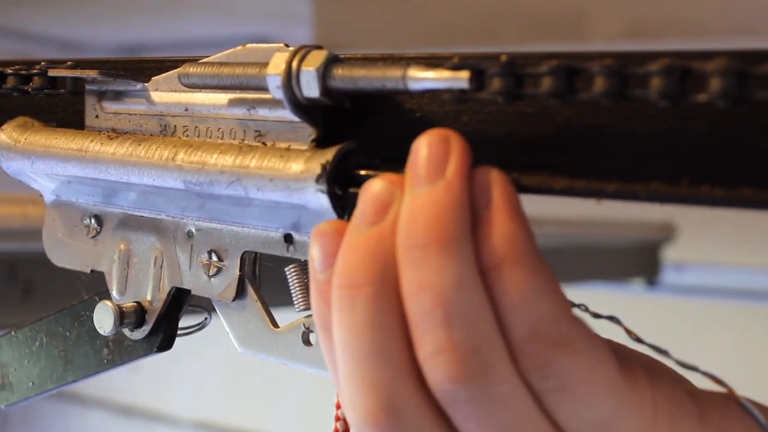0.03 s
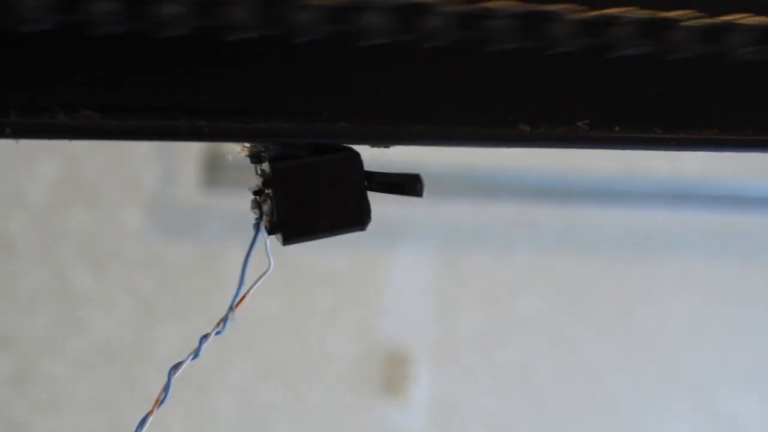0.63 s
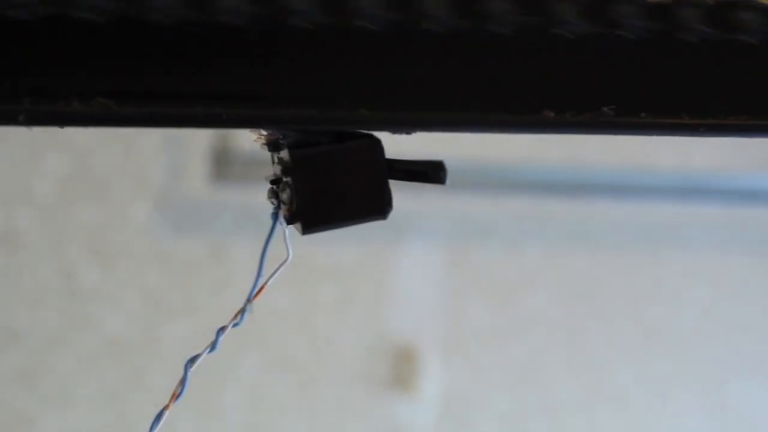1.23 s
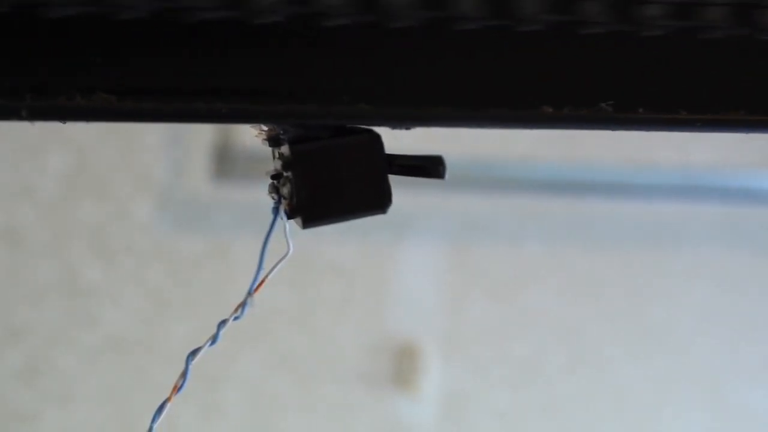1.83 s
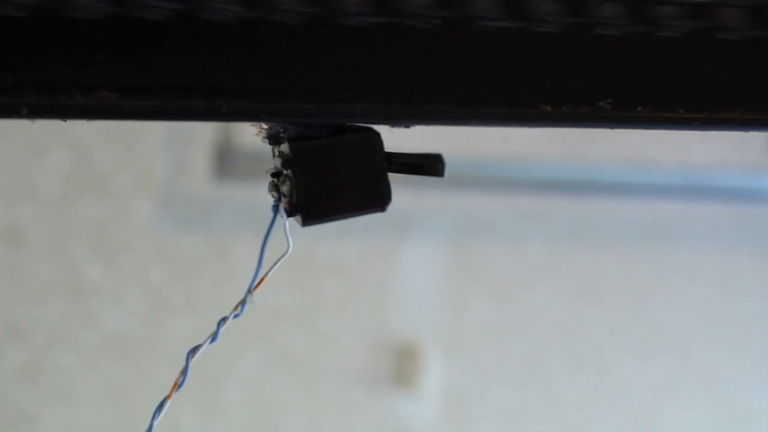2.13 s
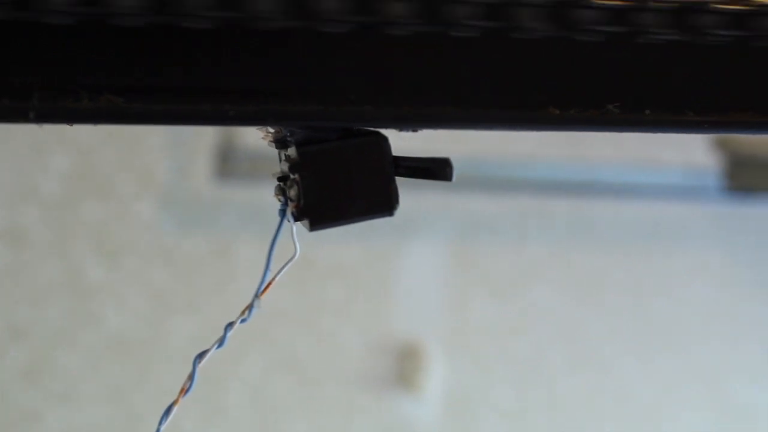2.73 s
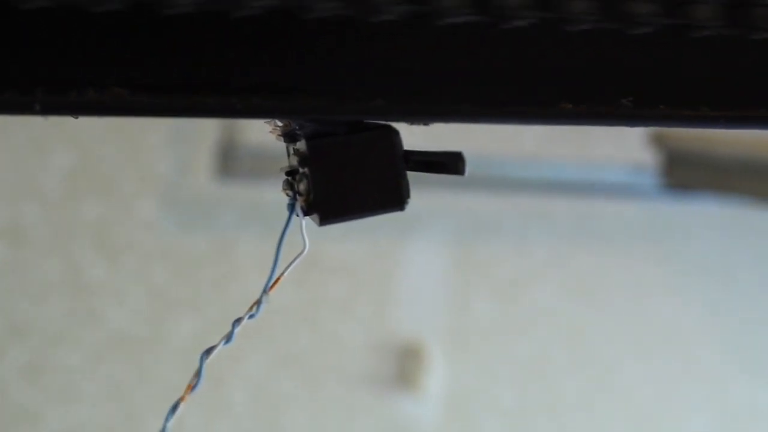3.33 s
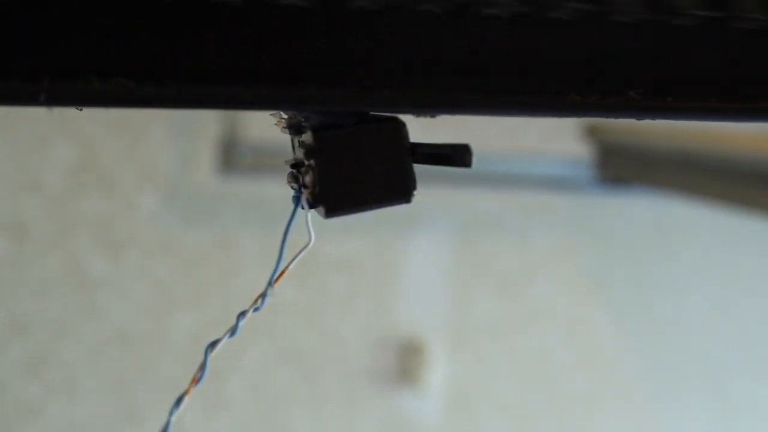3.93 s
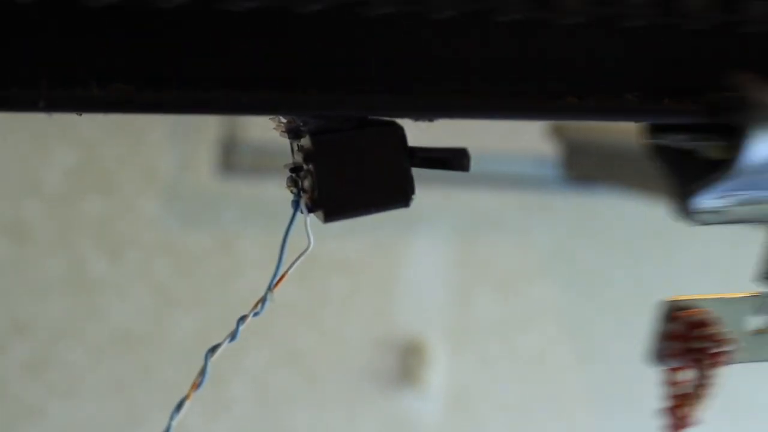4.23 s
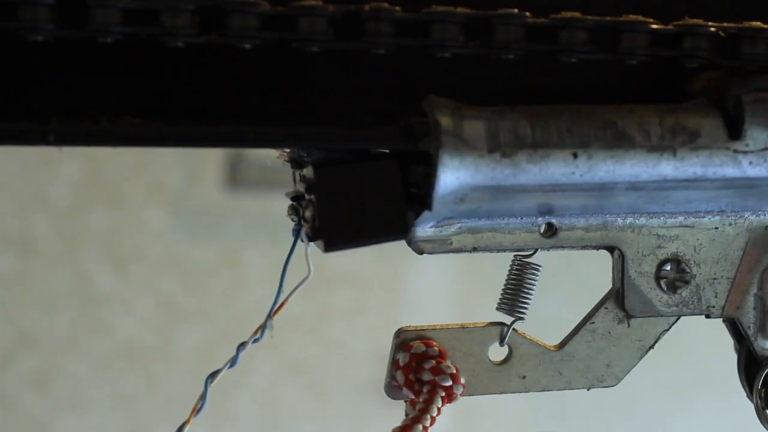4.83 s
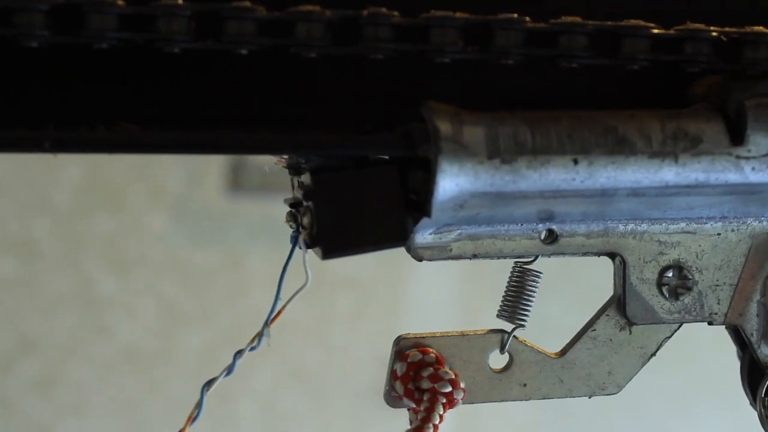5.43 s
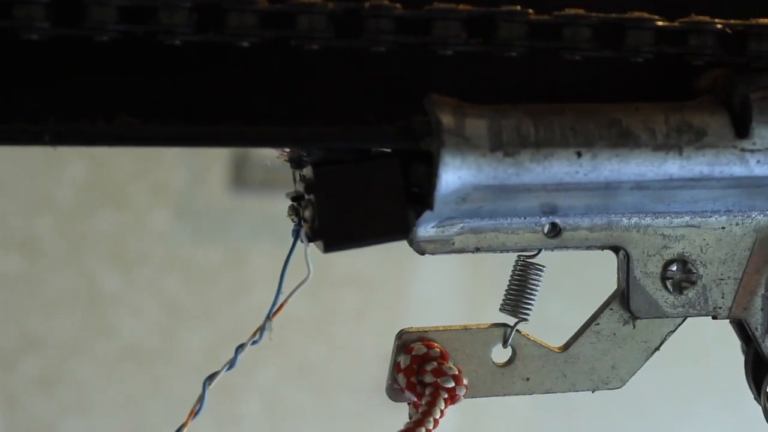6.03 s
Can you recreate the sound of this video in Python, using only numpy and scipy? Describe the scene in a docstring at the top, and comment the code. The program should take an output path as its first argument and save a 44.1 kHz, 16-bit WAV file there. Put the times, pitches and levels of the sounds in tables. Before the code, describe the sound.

A garage door opener comes in abruptly, already running, its motor humming low and its gears whining while the chain clatters and knocks against a rumbling metal rail. A dry switch click cuts the power and the rattle quickly dies away. A few fading metallic clicks follow, with faint birdsong and a soft hush from outdoors. The microphone is close beneath the rail, and the garage adds a short echo.

```python
"""In a garage, just under the rail of a chain-driven door opener, the running drive is heard abruptly.
The motor hums at twice the mains frequency, gears whine and loose sheet metal buzzes, while the chain
rattles, slaps and scrapes along the rail, exciting its resonances. A limit switch cuts the power and
the drive coasts to rest. Trolley and chain click as they settle, and birds sing faintly outside."""
import sys
import numpy as np
from scipy import signal
from scipy.fft import rfft, irfft
from scipy.io import wavfile

SR = 44100
rng = np.random.default_rng(int(sys.argv[2]) if len(sys.argv) > 2 else 0)


def transcribe(signal):
    """Save signal, clipped to [-1, 1], as a 16-bit WAV file at the path in sys.argv[1]."""
    frames = np.atleast_2d(signal).T
    limited = np.clip(frames, -1, 1)
    pcm = np.round(limited * 32767).astype(np.int16)
    wavfile.write(sys.argv[1], SR, pcm)


N = 268877
TIME = np.arange(N) / SR
START_S, POWER_OFF_S, STANDSTILL_S = 0.4275, 4.54, 4.91
HUM_HZ, LINK_HZ, FIRST_LINK_S = 120.0, 14.285, 0.057
TRILL_START_S, TRILL_PERIOD_S = 5.066, 0.098
GARAGE_T60_S, CUTOFF_HZ = 0.36, 15750

# Spectral envelopes. Each row: frequency in Hz, relative spectral density in dB.
OUTDOOR_SPECTRUM = [(25, -3), (140, 0), (300, -6), (420, -12), (600, -1), (900, -12), (1700, -12.5),
                    (2500, -11), (3500, -6.5), (5300, -7.5), (6300, -15), (8800, -25), (16000, -25)]
KNOCK_SPECTRUM = [(100, -27), (300, 1), (700, 2.5), (1500, 1.5), (2200, 0.5), (2900, -18)]
CLACK_SPECTRUM = [(1900, -11.5), (2900, -1), (3800, 0), (4300, -0.5), (4800, -16), (6500, -23)]
TINK_SPECTRUM = [(4500, 3.5), (6000, -4), (7500, 5.5), (10000, -3.5), (12500, -7), (16000, -15)]
SNAP_SPECTRUM = [(4500, 2), (6000, -2), (7500, 1), (10000, -4), (13000, -2), (16000, -5)]
SQUEAK_SPECTRUM = [(1100, -24), (1500, 6.5), (2100, 5.5), (2700, -17), (4000, -2), (4700, -18)]
HOUSING_SPECTRUM = [(4000, -13), (5600, -1), (8000, 1), (9500, -0.5), (11000, -1), (13400, -1.5),
                    (14150, -3), (15300, -4), (17000, 4)]
SLAP_SPECTRUM = [(300, -15), (700, 2.5), (1500, 5), (2500, -3.5), (4200, -7.5), (5500, -14), (9000, -18)]
RUMBLE_SPECTRUM = [(20, -29), (45, -12), (65, -9), (100, 0.5), (160, 1.5), (260, 0), (480, -3), (750, 4),
                   (950, -21.5), (1500, -55.5)]
COASTING_SPECTRUM = [(20, -22), (60, -4), (100, 1.5), (200, 2.5), (330, -1), (500, -7), (750, -9),
                     (1000, -15)]
CLATTER_SPECTRUM = [(500, -28.5), (780, -3), (900, -4), (1200, -1.5), (1500, 0), (1720, -6.5),
                    (2300, -38.5)]
RATTLE_SPECTRUM = [(1200, -26.5), (1750, 0), (2300, -0.5), (4000, -2.5), (5000, -8), (5700, -18),
                   (8000, -47.5)]

# Resonances of the metal parts. Each row: centre in Hz, bandwidth in Hz, lift in dB.
TROLLEY_MODES = [(325, 40, 6), (610, 50, 4), (790, 70, 5), (1040, 70, 5), (1360, 80, 7), (1610, 80, 6),
                 (2050, 120, 6), (2980, 70, 6), (3340, 110, 4), (3770, 220, 7), (4090, 140, 2),
                 (6900, 250, 4), (7600, 500, 6), (8580, 120, 5), (12300, 450, 8), (13500, 300, 5)]
SQUEAK_MODES = [(1640, 130, 7), (2010, 160, 10.5), (3700, 92, 20), (3950, 120, 11)]
HOUSING_MODES = [(5770, 110, 5), (6370, 35, 7), (6610, 70, 8), (6830, 90, 8), (7930, 110, 11),
                 (8070, 70, 5), (8410, 80, 8), (8610, 60, 4), (8880, 130, 7), (9130, 70, 9), (9790, 110, 8),
                 (10650, 130, 5), (11380, 160, 10), (12250, 250, 4), (12700, 250, 7), (13600, 280, 4),
                 (15120, 160, 8), (15580, 140, 5)]
RAIL_MODES = [(345, 70, 6), (608, 55, 8), (1085, 60, 4), (1350, 70, 5), (1520, 70, 3), (1910, 70, 3),
              (3225, 50, 6), (4890, 80, 8)]

# Idle mains hum. Each row: frequency in Hz, rms level in dB.
IDLE_TONES = [(240, -60), (600, -58), (720, -65)]
# Birds' quick slurs and held notes. Each row: start in seconds, first pitch in Hz, relative level in dB.
BIRD_SLURS = [(5.41, 4350, -53), (5.52, 3950, -50), (5.575, 4730, -46), (5.625, 5420, -48),
              (5.662, 3810, -48), (5.688, 3200, -47.5)]
BIRD_HELD_NOTES = [(5.252, 3230, -53), (5.74, 4620, -45), (5.975, 4600, -41.5), (6.034, 4460, -38.5)]
# One rising note of the trill. Each row: age in seconds, pitch in Hz, relative level in dB.
TRILL_NOTE = [(0, 4700, -65), (.007, 5030, -46), (.014, 5500, -48.5), (.019, 6320, -55), (.026, 7200, -57),
              (.036, 7900, -83)]
# Trolley and chain settling. Each row: start in seconds, relative knock, clack and tink levels in dB.
SETTLING_CLICKS = [(4.688, -40, -29, -32), (4.818, -19.5, -19.5, -22), (4.9723, -26, -15.5, -32.5),
                   (5.136, -27, -28.5, -46), (5.245, -40.5, -46, -57), (5.401, -36.5, -51, -61),
                   (5.487, -36, -37.5, -45), (5.56, -43, -43, -62), (5.84, -33, -35, -40)]
# Snaps of the limit switch. Each row: start in seconds, clack level in dB, tink level in dB.
SWITCH_SNAPS = [(4.543, -18, -27), (4.745, -21, -23.5)]
# Chain scraping the rail's edge. Each row: peak time and width in seconds, rasp and squeak levels in dB.
SCRAPES = [(.497, 0.0073, -21.5, -38), (.565, .014, -26.5, -40), (.64, .02, -29.5, -37),
           (.775, .011, -30, -42), (1.005, 0.027, -27, -47), (1.135, 0.028, -28, -45),
           (1.675, 0.0055, -27, -39), (3.005, 0.021, -37, -28), (3.228, 0.023, -24.5, -33),
           (3.37, 0.017, -33, -25.5), (3.50, 0.018, -42, -25.5), (3.556, .0064, -24, -26),
           (3.59, 0.017, -42, -27)]
# Links that land hard. Each row: start in seconds, tick level in dB, slap level in dB.
HARD_LINKS = [(.6175, -25, -34), (.7647, -40, -25), (0.969, -39, -20.5), (1.102, -32, -25),
              (1.1765, -26.5, -26), (1.2453, -34, -30), (1.3152, -25.5, -19), (1.454, -28.5, -20),
              (2.093, -40, -19), (2.437, -27.5, -23), (2.578, -26.5, -37), (3.0014, -40, -22),
              (3.208, -26, -15), (3.2807, -42, -24), (3.4195, -26, -39), (3.4875, -25, -22.5),
              (3.6968, -26, -20), (3.9785, -22, -19), (4.1887, -32, -20), (4.262, -43, -18.5),
              (4.4698, -27, -19), (4.534, -19.5, -30), (4.632, -41, -20)]
# Course of the rail's rumble. Each row: time in seconds, relative level in dB.
RUMBLE_LEVEL = [(.45, -24), (1.6, -25.5), (2.4, -25.5), (2.8, -23), (3.3, -24), (4.4, -26.5), (4.58, -23.5),
                (4.7, -30), (4.79, -23.5), (4.86, -34.5), (4.96, -41.5)]
# Load on the drive. Each row: time in seconds, hum gain in dB, gear whine gain in dB.
DRIVE_LOAD = [(.43, -1.5, 2.5), (1.2, -0.5, -2), (2, 0.5, 0), (2.7, -0.5, 2), (3.3, -1.5, 2.5),
              (3.9, -1.5, 2), (4.3, -0.6, 7.5), (4.55, -2, 4.5)]
# Gear and rotor tones. Each row: frequency in Hz, rms level in dB before the load gain.
GEAR_TONES = [(86, -42), (175, -45.5), (806, -48), (1028, -46), (1267, -37), (1386, -34), (4885, -51)]
# Motor hum. Each row: harmonic number, rms level in dB before the load gain, random waver in dB.
HUM_HARMONICS = [(1, -17, 1.13), (2, -20, 1.0), (3, -36, 4), (4, -40, 0.5), (6, -25, 0.5), (7, -40, 0.5),
                 (9, -38.5, 4), (10, -41.5, -3)]


def from_db(db):
    """Amplitude grows tenfold for every 20 dB."""
    return 10 ** (np.asarray(db) / 20)


def unit_rms(x):
    """Division by the rms value gives unit power."""
    return x / np.sqrt(np.mean(x ** 2) + 1e-20)


def in_time(rows):
    """Linear interpolation gives each column of a timed table at every sample."""
    times, *columns = np.transpose(rows)
    return [np.interp(TIME, times, column) for column in columns]


def decay(after_s, t60):
    """Damping: unit gain until after_s, then a fall of 60 dB every t60 seconds."""
    return from_db(-60 * np.clip((TIME - after_s) / t60, 0, 4))


def drift(rate_hz):
    """Low-pass filtering turns noise into a smooth wander of unit rms."""
    hz = np.fft.rfftfreq(N, 1 / SR)
    return unit_rms(irfft(rfft(rng.standard_normal(N)) / (1 + (hz / rate_hz) ** 2), N))


def body(x, spectrum, modes=()):
    """Resonance: a filter of unit power gain whose modes stand out of a broad spectral envelope."""
    size = 8192
    hz = np.fft.rfftfreq(size, 1 / SR)
    points, levels = np.transpose(spectrum)
    log_hz, log_points = np.log2(hz + 1), np.log2(points)
    octaves_outside = np.abs(log_hz - np.clip(log_hz, log_points[0], log_points[-1]))
    db = np.interp(log_hz, log_points, levels) - 20 * np.minimum(octaves_outside, 2)
    for centre, width, lift in modes:
        db = db + lift / (1 + (2 * (hz - centre) / width) ** 2)
    cepstrum = irfft(np.log(from_db(db)))
    response = irfft(np.exp(rfft(2 * cepstrum[:size // 2], size)))   # minimum phase: nothing rings early
    return signal.oaconvolve(x, response / np.linalg.norm(response))[:N]


def contacts(per_s, spread_db):
    """Shot noise: tiny independent impacts of uneven strength, at unit power."""
    impacts = (rng.random(N) < per_s / SR) * rng.standard_normal(N)
    return unit_rms(impacts * from_db(spread_db * rng.standard_normal(N)))


def blow(start_s, db, t60, room_db):
    """Envelope of an impact: the metal's short ring and the garage's reverberation add in power."""
    reverberation = from_db(room_db) * decay(start_s, GARAGE_T60_S)
    return from_db(db) * (TIME >= start_s) * np.hypot(decay(start_s, t60), reverberation)


def tone(hz, db, wobble=0):
    """Phase modulation: a sine at an rms level, displaced by a wobble in radians."""
    return np.sqrt(2) * from_db(db) * np.sin(2 * np.pi * hz * TIME + wobble)


def throb(depth_db, lead_cycles):
    """Amplitude modulation: a gain that swells once per hum cycle."""
    return from_db(depth_db * np.cos(2 * np.pi * (HUM_HZ * TIME + lead_cycles)))


def background():
    """The noise floor is a broadband outdoor hush plus faint mains harmonics."""
    hush = from_db(-48) * body(rng.standard_normal(N), OUTDOOR_SPECTRUM)
    return hush + sum(tone(hz, db) for hz, db in IDLE_TONES)


def whistle(start_s, first_hz, db, length_s, fall_hz_per_s):
    """A linear chirp: one bird note swells and fades as its pitch falls."""
    age = np.clip(TIME - start_s, 0, length_s)
    pitch = first_hz - fall_hz_per_s * age
    return from_db(db) * np.sin(np.pi * age / length_s) * np.sin(2 * np.pi * np.cumsum(pitch) / SR)


def birds():
    """Reverberation: whistles and a trill from outside are convolved with the garage's echoes."""
    song = sum(whistle(*note, length_s=0.048, fall_hz_per_s=12500) for note in BIRD_SLURS)
    song += sum(whistle(*note, length_s=0.079, fall_hz_per_s=3800) for note in BIRD_HELD_NOTES)
    age = np.maximum(TIME - TRILL_START_S, 0) % TRILL_PERIOD_S
    ages, hz, db = np.transpose(TRILL_NOTE)
    trill_envelope = np.interp(age, ages, from_db(db), right=0) * (TIME > TRILL_START_S)
    song += trill_envelope * np.sin(2 * np.pi * np.cumsum(np.interp(age, ages, hz)) / SR)
    echoes = rng.standard_normal(N) * decay(0, GARAGE_T60_S)
    reverberation = signal.fftconvolve(song, echoes / np.linalg.norm(echoes))[:N]
    return from_db(0.5) * song + from_db(5.0) * reverberation


def click_band(column, spectrum, ring_scale, room_db):
    """Free decay of one band of trolley modes, which ring longer as the chain slackens."""
    envelope = 0
    for start_s, *levels in SETTLING_CLICKS:
        t60 = ring_scale * np.interp(start_s - POWER_OFF_S, [0, 0.85], [0.027, 0.091])
        envelope += blow(start_s, levels[column], t60, room_db)
    return body(envelope / np.sqrt(ring_scale) * rng.standard_normal(N), spectrum, TROLLEY_MODES)


def settling():
    """Modal excitation: each click has its own mix of low, middle and high modes; low ones ring longest."""
    knock = click_band(0, KNOCK_SPECTRUM, ring_scale=1.4, room_db=-6)
    clack = click_band(1, CLACK_SPECTRUM, ring_scale=0.77, room_db=-14)
    tink = click_band(2, TINK_SPECTRUM, ring_scale=1.0, room_db=-8.5)
    return from_db(-2.3) * knock + clack + tink


def limit_switch():
    """Impulsive excitation: close, dry snaps ring the trolley's middle and high modes."""
    t60, room_db = 0.028, -17
    clack_envelope = sum(blow(start_s, db, t60, room_db) for start_s, db, _ in SWITCH_SNAPS)
    tink_envelope = sum(blow(start_s, db, t60, room_db) for start_s, _, db in SWITCH_SNAPS)
    clack = body(clack_envelope * rng.standard_normal(N), CLACK_SPECTRUM, TROLLEY_MODES)
    tink = body(tink_envelope * rng.standard_normal(N), SNAP_SPECTRUM, TROLLEY_MODES)
    return clack + tink


def scrapes():
    """Stick-slip friction: short swells of a broad rasp and of a squeak in a few narrow bands."""
    rasp = squeak = 0
    for peak_s, width_s, rasp_db, squeak_db in SCRAPES:
        swell = np.exp(-0.5 * ((TIME - peak_s) / width_s) ** 2)
        rasp += from_db(rasp_db) * swell
        squeak += from_db(squeak_db) * swell
    slips = contacts(2700, spread_db=-2.0)
    return body(slips * rasp, RATTLE_SPECTRUM) + body(slips * squeak, SQUEAK_SPECTRUM, SQUEAK_MODES)


def housing():
    """Forced vibration: loose sheet metal buzzes each hum cycle, with repeating and fresh contacts."""
    swell = throb(depth_db=3.5, lead_cycles=0.33)
    mains_cycle = np.arange(N) % round(2 * SR / HUM_HZ)
    # the seating of the panels shifts slowly, so the buzzing harmonics waver
    repeating = unit_rms(sum(rng.standard_normal(N)[mains_cycle] * drift(6.3) for _ in range(5)))
    shake = unit_rms((contacts(20000, spread_db=-2.0) + 0.85 * repeating) * swell)
    sizzle = body(shake, HOUSING_SPECTRUM, HOUSING_MODES)
    rail_buzz = body(repeating * swell, RATTLE_SPECTRUM, RAIL_MODES) * from_db(2.5)
    return from_db(-37) * (sizzle + rail_buzz) * decay(POWER_OFF_S, t60=0.44)


def coasting():
    """Inertia: the chain runs on briefly without power, then the gain of its rattle decays."""
    return decay(POWER_OFF_S + 0.025, t60=0.87)


def each_link(spread_db):
    """Periodic impacts: each passing link's random strength, and the seconds since it landed."""
    link, fraction = np.divmod(np.maximum(TIME - FIRST_LINK_S, 0) * LINK_HZ, 1)
    strength = from_db(spread_db * np.minimum(rng.standard_normal(int(link[-1]) + 1), 1.5))
    return strength[link.astype(int)], fraction / LINK_HZ


def landings(column, usual_db, t60, room_db):
    """Superposed impacts: decaying noise bursts for a regular run of light links and for the hard ones."""
    strength, age = each_link(spread_db=6.5)
    light = strength * from_db(usual_db - 60 * age / t60) * coasting()
    hard = sum(blow(start_s, levels[column], t60, room_db) for start_s, *levels in HARD_LINKS)
    return (light + hard) * rng.standard_normal(N)


def chain_hits():
    """Impact sound: each link ticks brightly and slaps the rail into a duller ring."""
    ticks = landings(0, usual_db=-38.5, t60=0.016, room_db=-22)
    slaps = landings(1, usual_db=-32, t60=0.069, room_db=-17.5)
    return body(ticks, HOUSING_SPECTRUM) + body(slaps, SLAP_SPECTRUM, RAIL_MODES)


def chain_rattle():
    """Modulated contact noise: the motor's torque pulses and each passing link shake the chain."""
    strength, age = each_link(spread_db=3.5)
    link_beat = unit_rms(np.hypot(1, strength * np.exp(-age / 0.012)))
    link_beat *= from_db(0.31 * drift(35) + 0.57 * drift(5.6))
    low_shake = contacts(5000, spread_db=3.0) * throb(depth_db=2.5, lead_cycles=0.56)
    high_shake = contacts(5000, spread_db=0.0) * throb(depth_db=-1.0, lead_cycles=0.46)
    clatter = from_db(-28) * body(low_shake * link_beat, CLATTER_SPECTRUM, RAIL_MODES)
    rattle = from_db(-30.5) * body(high_shake * link_beat, RATTLE_SPECTRUM, RAIL_MODES)
    _, gear_load_db = in_time(DRIVE_LOAD)
    return (clatter + rattle) * from_db(0.34 * gear_load_db) * coasting()


def rail_rumble():
    """Rolling noise: rollers knock along the rail, and the spectrum sinks as the drive coasts down."""
    level_db, = in_time(RUMBLE_LEVEL)
    speed = decay(POWER_OFF_S, t60=0.9)
    driven = body(contacts(4000, spread_db=1.0), RUMBLE_SPECTRUM, RAIL_MODES)
    slowing = body(contacts(1500, spread_db=2.0), COASTING_SPECTRUM, RAIL_MODES)
    rumble = speed * driven + np.sqrt(1 - speed ** 2) * slowing
    return rumble * from_db(level_db + 0.83 * drift(9.6)) * decay(STANDSTILL_S, t60=1.57)


def motor():
    """Magnetic forces hum at twice the mains frequency; gear tones waver and swell with the load."""
    hum_db, whine_db = in_time(DRIVE_LOAD)
    hum = whine = 0
    for harmonic, db, waver in HUM_HARMONICS:
        level_db = db + hum_db + waver * drift(14.0)
        hum += tone(harmonic * HUM_HZ, level_db, wobble=0.017 * waver * drift(2.4))
    slip = drift(0.81)   # phase wander shared by all gear and rotor tones
    for hz, db in GEAR_TONES:
        level_db = db + whine_db + 1.6 * drift(1.1)
        whine += tone(hz, level_db, wobble=0.00083 * hz * slip + 0.42 * drift(2.6))
    return hum * decay(POWER_OFF_S, t60=0.068) + whine * decay(POWER_OFF_S, t60=0.17)


def scene():
    """Superposition: the pressures of all sources add at one point."""
    drive = motor() + rail_rumble() + chain_rattle() + chain_hits() + housing() + scrapes()
    return (drive + limit_switch() + settling() + birds() + background())[None]


def record(dry):
    """Gating and band limiting: the sound starts abruptly and a low-pass removes the highest treble."""
    low_pass = signal.ellip(10, 0.2, 80, CUTOFF_HZ, fs=SR, output="sos")
    return signal.sosfilt(low_pass, dry * (TIME >= START_S))


dry = scene()
out = record(dry)
transcribe(out)
```